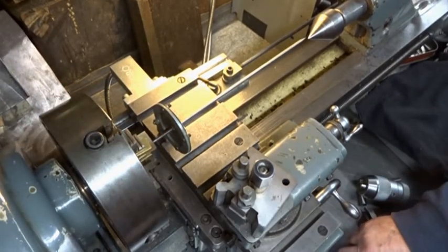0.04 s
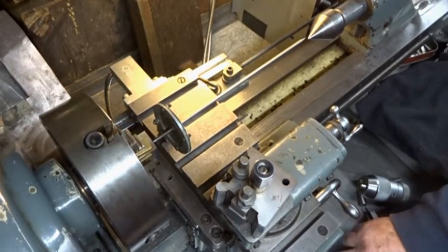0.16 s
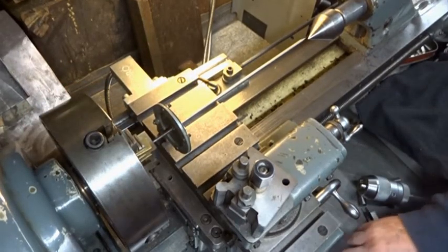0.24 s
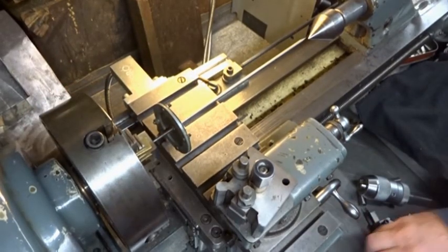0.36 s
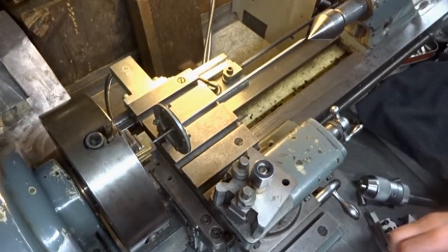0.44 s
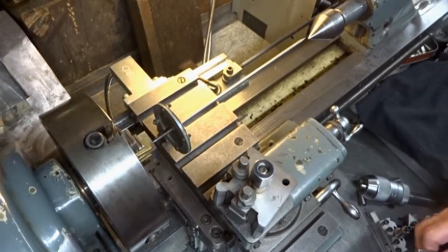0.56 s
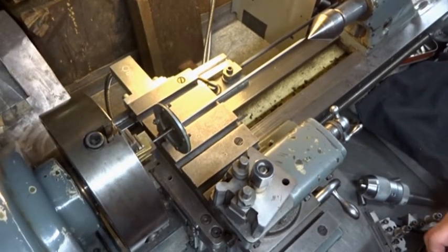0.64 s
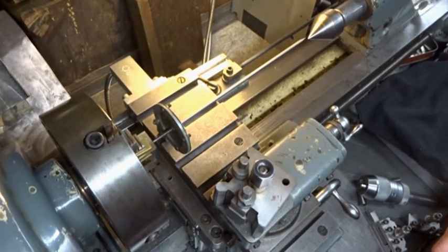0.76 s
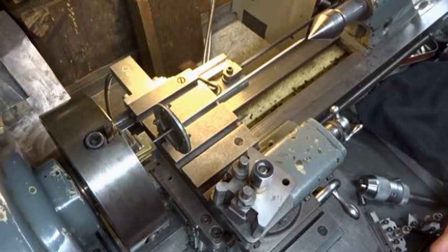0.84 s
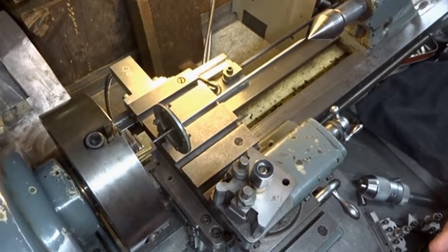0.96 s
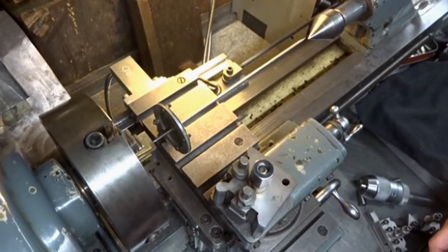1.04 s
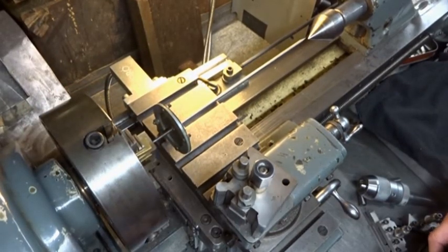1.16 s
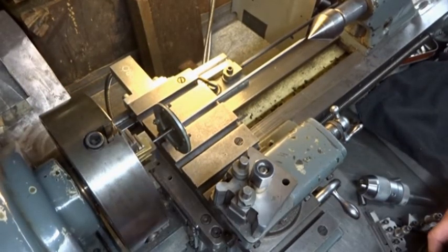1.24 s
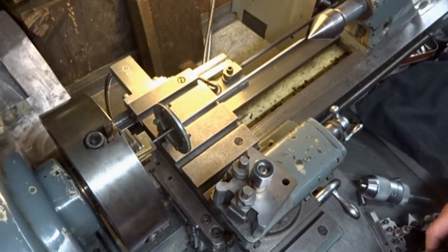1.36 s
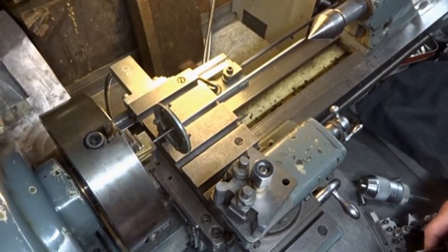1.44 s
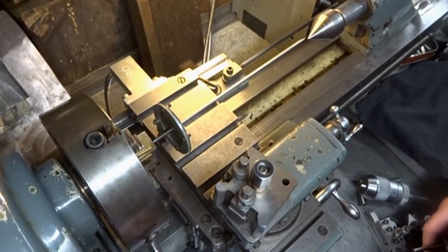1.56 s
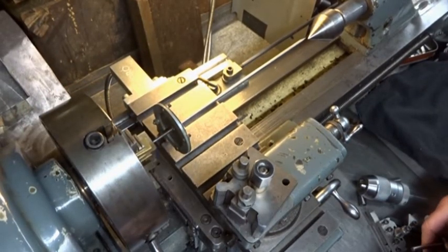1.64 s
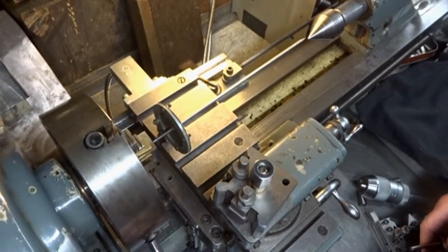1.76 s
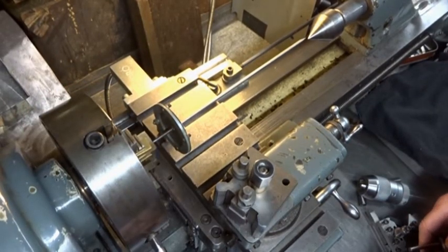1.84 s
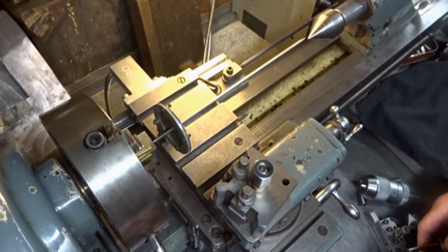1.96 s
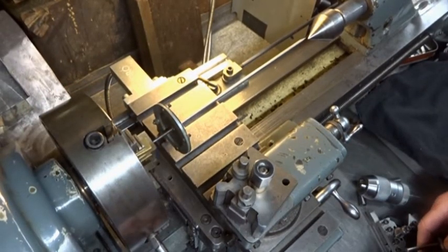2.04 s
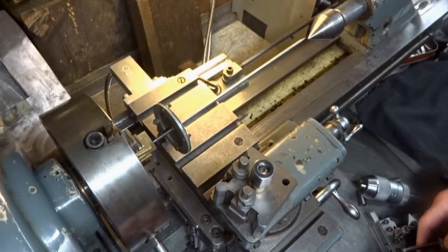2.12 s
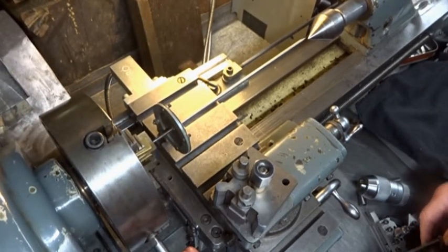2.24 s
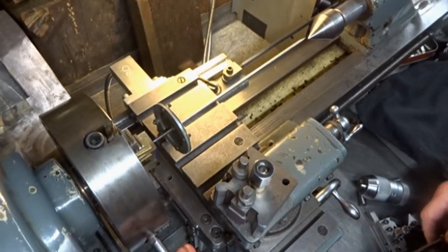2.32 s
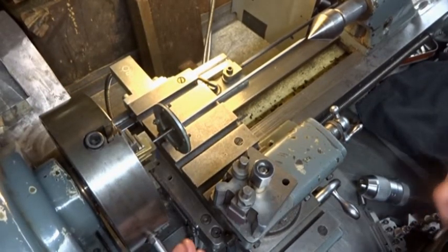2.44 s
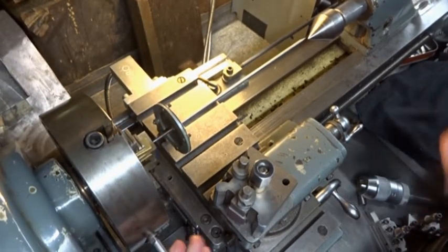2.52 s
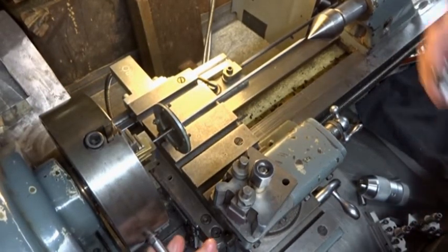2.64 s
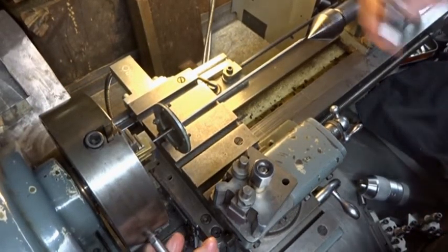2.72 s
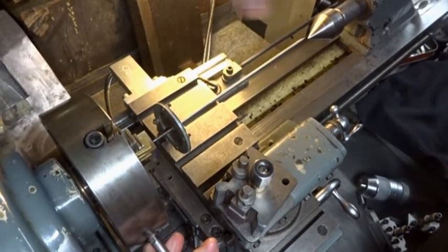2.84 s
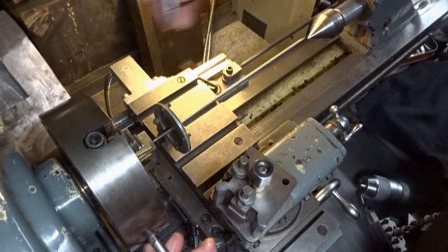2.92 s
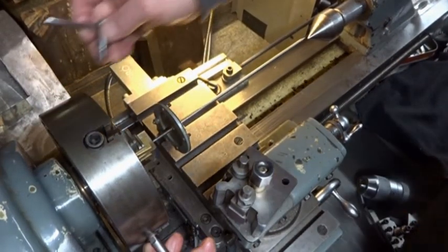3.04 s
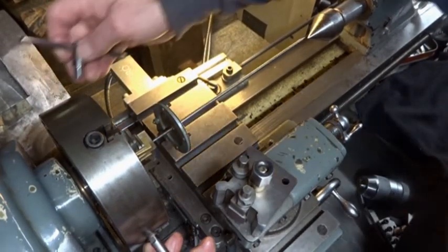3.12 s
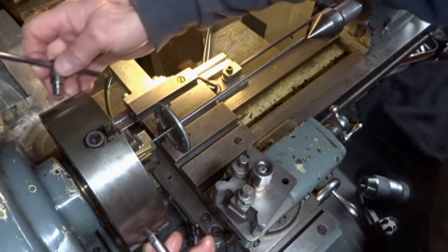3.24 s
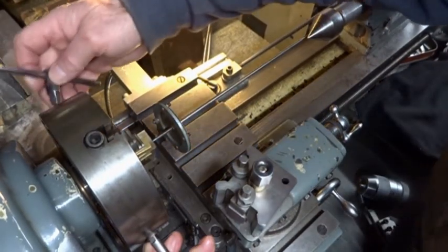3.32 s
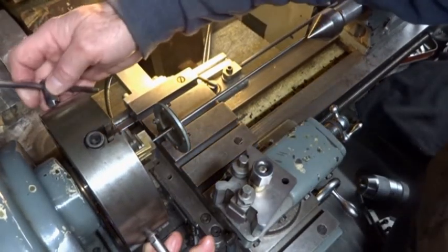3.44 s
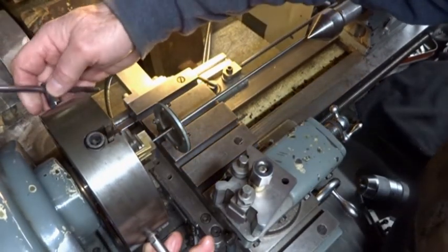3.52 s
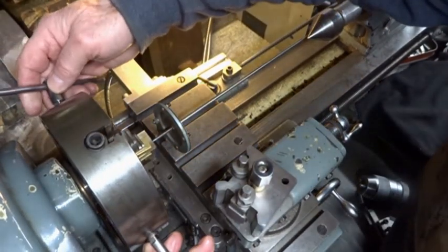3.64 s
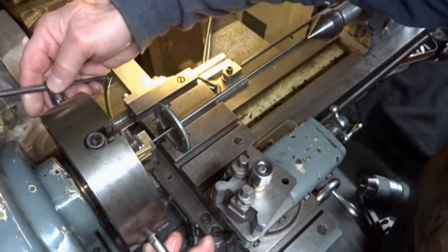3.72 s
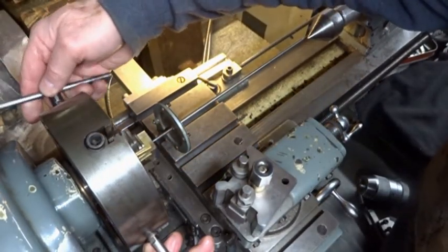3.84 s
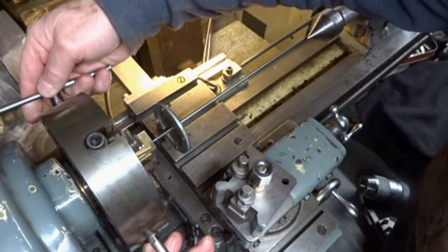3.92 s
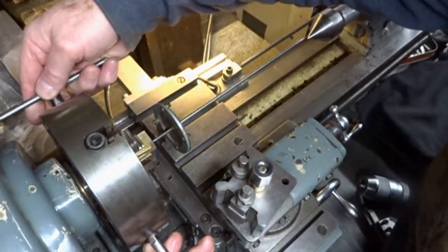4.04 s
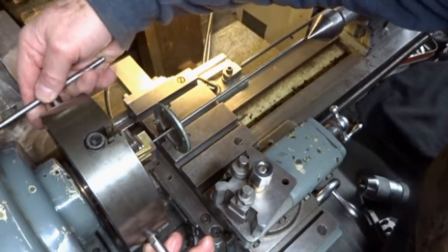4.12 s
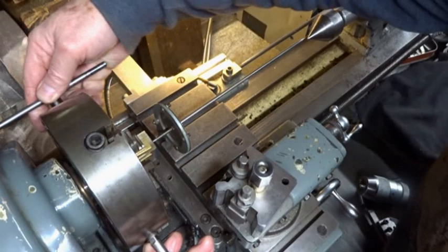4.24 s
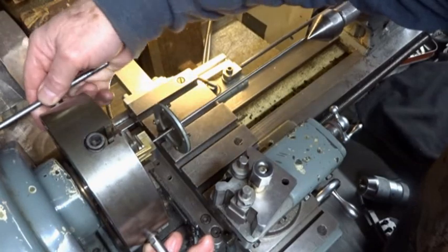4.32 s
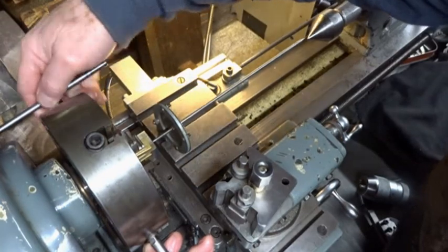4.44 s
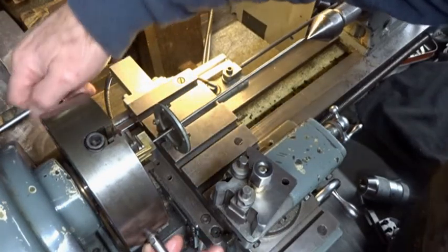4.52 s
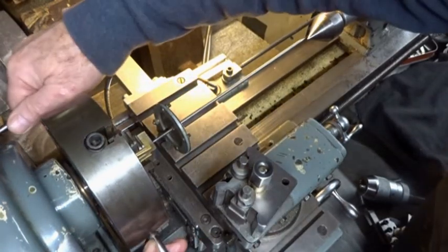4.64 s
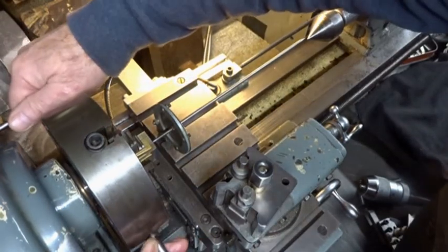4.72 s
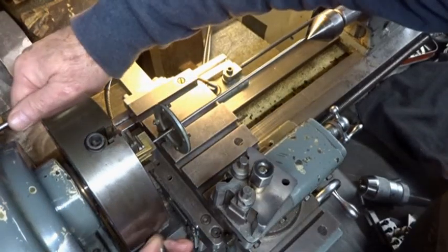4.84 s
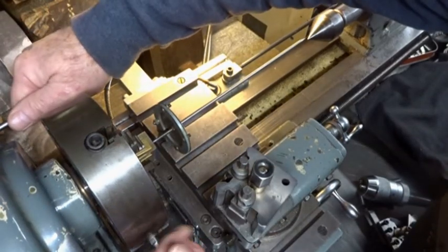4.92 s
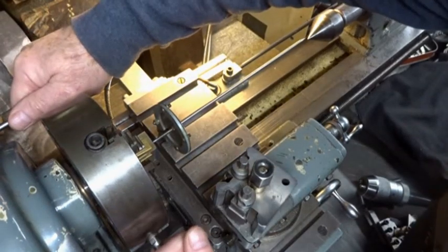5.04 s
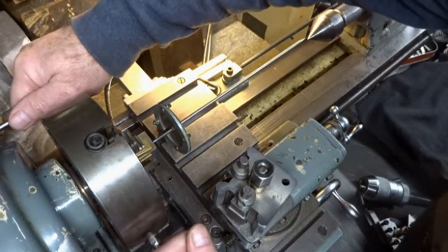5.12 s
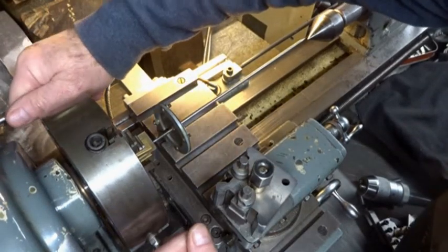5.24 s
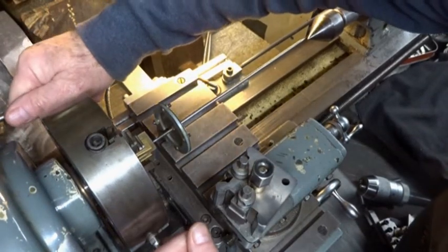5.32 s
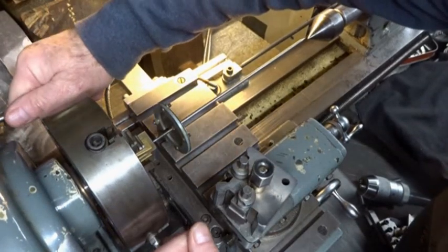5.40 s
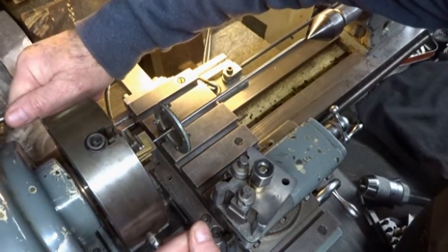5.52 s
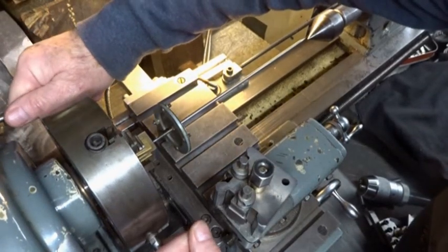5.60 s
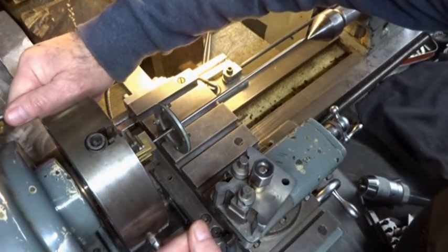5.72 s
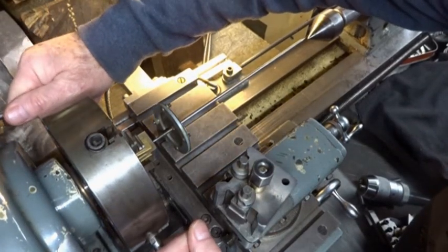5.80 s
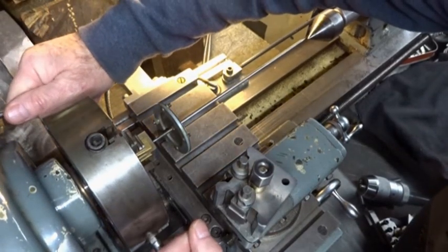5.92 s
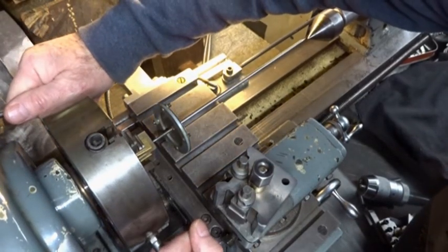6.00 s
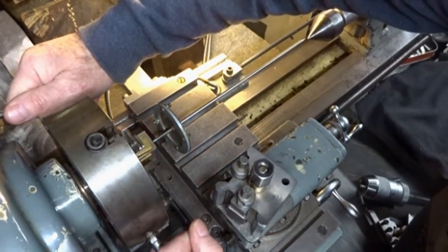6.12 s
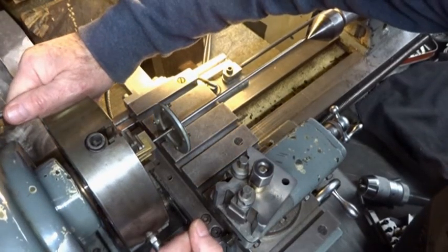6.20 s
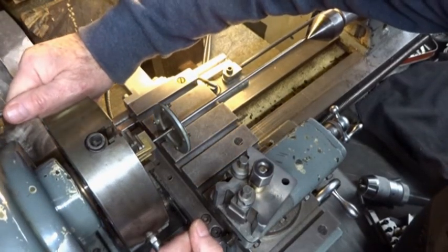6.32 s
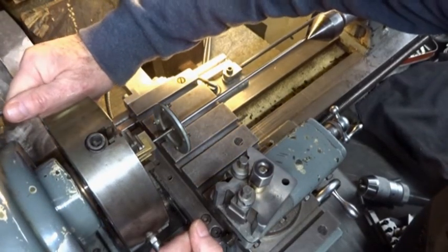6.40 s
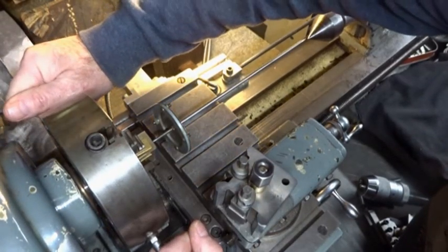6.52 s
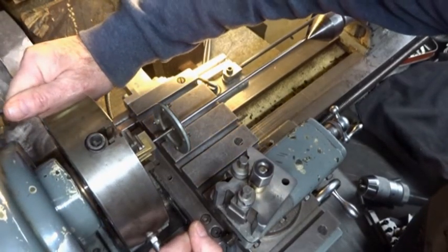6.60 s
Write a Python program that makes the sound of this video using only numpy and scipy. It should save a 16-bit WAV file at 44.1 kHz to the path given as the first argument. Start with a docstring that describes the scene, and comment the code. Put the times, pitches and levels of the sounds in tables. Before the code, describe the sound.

Close stereo pickup at a lathe in a workshop, with a faint, constant, airy fan hum throughout. At 0 s a hard, loud steel clack rings briefly; a heavy casting then grinds roughly along the bed, with further clacks near 0.2 and 0.4 s. A scrape swells from about 0.7 s into a rapid cluster of heavy clacks around 0.9 s, then dies away. After a soft rub at 1.2 s, lighter key taps begin at 1.7 s, with sharper clicks at 1.9 and 2.2 s. Cloth brushes at 2.5 s and more fully from 2.9 to 3.7 s. A bright, strong click lands at 3.4 s, followed by knocks at 3.5 to 3.7 s and scattered clicks and duller socket knocks from 4.0 to 4.5 s. A quick sleeve swish comes at 4.6 s, a tiny tap at 4.7 s and a last faint knock at 5.3 s. Mostly fan hum remains until about 6.5 s.

```python
"""A steel clack opens the scene: a lathe's tailstock, unclamped, grinds along the bed between heavy clacks.
A fan hums steadily behind, made of shaped noise with a few broad resonances.
A sleeve then rubs and brushes past, as noise that swells with each movement of the arm.
Two steel chuck keys click into the jaw screws and knock in their sockets.
Each blow is a burst of filtered noise plus decaying sine modes; a short room tail follows the steel."""
import sys
import numpy as np
from scipy import signal
from scipy.fft import rfft, irfft, next_fast_len
from scipy.io import wavfile
from scipy.ndimage import uniform_filter1d, map_coordinates

SR = 44100
rng = np.random.default_rng(int(sys.argv[2]) if len(sys.argv) > 2 else 0)


def pcm_store(signal):
    """Save signal as 16-bit PCM."""
    levels = np.round(np.clip(np.atleast_2d(signal), -1, 1) * 32767)
    wavfile.write(sys.argv[1], SR, levels.astype(np.int16).T)


N = 293688  # samples


def amp(db):
    """Decibels to gain."""
    return 10 ** (np.asarray(db) / 20)


def unit(x):
    """Scale to rms 1."""
    return x / np.sqrt(np.mean(x ** 2) + 1e-20)


def along(points, hz):
    """Read a curve of (f/Hz, value) points on a log frequency axis."""
    f, values = np.transpose(points)
    return np.interp(np.log(hz + 1), np.log(f + 1), values)


def filtered(x, response):
    """Shape x by a gain that is a function of frequency."""
    n = x.shape[-1]
    padded = next_fast_len(n + 4096)
    spectrum = rfft(x, padded) * response(np.fft.rfftfreq(padded, 1 / SR))
    return irfft(spectrum, padded)[..., :n]


def noise(colour, width, size=N):
    """Stereo noise of rms 1 with a gain by frequency and a side level by frequency."""
    def mid_side_gain(hz):
        return colour(hz) * np.array([np.ones_like(hz), amp(along(width, hz))])
    mid, side = filtered(rng.standard_normal((2, size)), mid_side_gain)
    return unit(np.array([mid + side, mid - side]))


def rush(spectrum, width, body=np.ones_like):
    """Stereo noise with a (f/Hz, level/dB) spectrum, heard through a body."""
    return noise(lambda hz: amp(along(spectrum, hz)) * body(hz), width)


def wobble(rate):
    """A smooth random curve with rate knots a second."""
    knots = rng.standard_normal(int(N * rate / SR) + 4)
    return map_coordinates(knots, [np.arange(N) * rate / SR], order=2)


def ripple(depth_db, spacing_hz):
    """Fixed random peaks and notches of a body with many close modes; shallow in the bass."""
    hz = np.arange(0, SR / 2, 8)
    field = unit(uniform_filter1d(rng.standard_normal(len(hz)), max(int(spacing_hz / 8), 1)))
    field = np.minimum(field, 2)
    return lambda f: amp(depth_db * np.interp(f, hz, field) * f / np.hypot(f, 700))


def tone(t, hz):
    """One sine partial, a little out of phase between the two channels."""
    return np.sin(2 * np.pi * hz * t + rng.uniform(0, 2 * np.pi) + rng.normal(0, 0.22, (2, 1)))


def stroke(start, length, attack_s, release_s, swell_db=0):
    """Gain of one movement: it sets in, rises by swell_db (falls if negative) and dies away."""
    t = np.maximum(np.arange(N) / SR - start, 0)
    to_go = np.maximum(1 - t / length, 0)
    release = np.exp(-np.maximum(t - length, 0) / release_s)
    return (1 - np.exp(-t / attack_s)) * amp(-swell_db * to_go) * release


# edges of the thump, knock, clank, clink and tick ranges: f/Hz
RANGE_EDGES = [120, 330, 650, 1800, 5500, 16000]


def in_range(f, lo, hi):
    """A soft-edged frequency range; the lowest is open downwards."""
    below = 1 if lo == RANGE_EDGES[0] else 1 + (lo / (f + 1)) ** 14
    return 1 / np.sqrt(below * (1 + (f / hi) ** 14))


# stereo width of the steel and the sleeve: f/Hz, side minus mid level/dB
STEEL_WIDTH = [(100, -16), (500, -11), (1000, -19), (2500, -9), (12000, -23.5)]


def strikes(rows, balance_db, decay, colour, body, modes, chatter, rise_cycles, low_t60, high_t60,
            high_ring_db, high_share, dense_db, rattle_db):
    """Steel on steel: a dense ring holds briefly, then dies away with clear modes; harder is brighter."""
    t = np.arange(SR // 3) / SR
    out = np.zeros((2, N + len(t)))
    centres = np.sqrt(np.multiply(RANGE_EDGES[:-1], RANGE_EDGES[1:]))
    octaves = np.log2(centres / np.median(centres))
    # a fast random level roughens the decay like tiny rebounds
    rattle = np.pad(amp(rattle_db * wobble(330)), (0, len(t)), "edge")

    def swell(hz):
        """Low modes build up more slowly than high ones."""
        return 1 - np.exp(-t * hz / rise_cycles)

    for s, strength_db, hardness, low_hz, high_hz, ring_db, length in rows:
        levels = strength_db + np.array(balance_db) + hardness * octaves
        blow_db = lambda hz: along(np.c_[centres, levels], hz)
        free = np.maximum(t / length - chatter, 0)  # scaled time since the faces came to rest
        hit = np.zeros((2, len(t)))

        for lo, hi, hz, t60, db in zip(RANGE_EDGES, RANGE_EDGES[1:], centres, decay, levels):
            dense_gain = lambda f: in_range(f, lo, hi) * amp(along(colour, f)) * body(f)
            band = noise(dense_gain, STEEL_WIDTH, size=len(t))
            hit += amp(db + dense_db - 60 * free / t60) * swell(hz) * band

        # the point of contact picks two modes of its own; hardness below 0 lifts the high one
        high_db = high_ring_db + high_share * ring_db - 0.5 * min(hardness, 0)
        for hz, db, t60 in (low_hz, ring_db, low_t60), (high_hz, high_db, high_t60):
            hit += amp(blow_db(hz) + db - 60 * free / t60) * swell(hz) * tone(t, hz)

        for hz, db, t60 in modes:
            mode_db = blow_db(hz) + rng.normal(0, 0.82) + db  # excited a little differently each time
            hit += amp(mode_db - 60 * t / (t60 * length)) * swell(hz) * tone(t, hz)

        start = round(s * SR)
        out[:, start:start + len(t)] += hit * rattle[start:start + len(t)]
    return out[:, :N]


# heavy blows: t/s, relative strength level/dB, hardness [dB per octave], low ring f/Hz, high ring f/Hz,
# low ring level/dB relative to the blow, decay length factor
TAILSTOCK_BLOWS = [ (0, -23.5, 0.67, 1261, 7730, -3, 0.8), (.228, -34, -0.9, 1385, 3200, -1.5, 1.11),
                   (.29, -53.5, -5, 220, 3020, 9, 1.7), (.391, -29, -0.5, 877, 7840, 11, 0.83),
                   (.475, -46, -2.4, 887, 3360, 10.5, 2.4), (.731, -54.5, -4.5, 1360, 3260, 8, 1.3),
                   (.861, -43.5, -4, 1360, 2260, 16, .7), (.889, -26.5, 2, 455, 10360, 9.5, 1.01),
                   (.918, -33.5, 1, 827, 2660, 7, 0.85), (.942, -32.5, .5, 700, 3380, -11, 0.55)]
# pushes over the bed: start t/s, length t/s, relative grind level/dB at the end, swell on the way level/dB,
# hiss level/dB relative to the grind, before the layer trims
BED_PUSHES = [ (0.091, 0.16, -44.5, -1, -4.5), (0.295, 0.094, -60, -5, 0), (0.436, 0.049, -36.5, 9, -1.5),
              (0.53, .2, -53.5, 2, -5.5), (0.723, 0.16, -31, 14, -6), (1.009, 0.26, -64, -4.5, 7.5)]
# level/dB of the five ranges at hardness 0
BED_BALANCE = [-18.5, -9.5, 1.5, -2.5, -2.5]
# t60 t/s of the dense ring in the five ranges, before the length factor
BED_RING_DECAY = [0.34, 0.26, 0.17, 0.18, 0.14]
# slope of the dense ring within the ranges: f/Hz, relative level/dB
BED_RING_COLOUR = [(40, -55), (85, -14), (140, -18), (200, -1), (260, -2), (340, -5.5), (450, -5.5),
                   (900, 8), (2000, 0.5), (16000, -10)]
# clear modes that every blow shares: f/Hz, level/dB relative to the blow, t60 t/s before the length factor
BED_CLEAR_MODES = [(447, 2.5, 0.19), (670, -2.5, 0.18), (877, -5, 0.077), (1083, -4, 0.047),
                   (1480, -15, 0.11), (3400, 0.5, 0.049), (6930, -15, 0.29), (7730, -9, 0.093),
                   (10200, -41, 0.058)]
# spectrum of the low scrape: f/Hz, relative level/dB per Hz
GRIND_SPECTRUM = [(50, -37), (140, -39), (200, -14), (350, -5), (460, 7.5), (700, 3.5), (880, 8.5),
                  (1020, 1), (1450, 13), (1750, -4), (4000, -20), (6000, -50)]
# spectrum of the bright scrape: f/Hz, relative level/dB per Hz
HISS_SPECTRUM = [(1060, -31), (1800, -2), (2100, 0.5), (3840, -5.5), (5700, -11.5), (6650, -9.5),
                 (13700, -17), (16000, -17)]


def tailstock():
    """The casting clacks against its stops and grinds over the ways in between."""
    bed = ripple(depth_db=2.0, spacing_hz=36)
    grind, hiss = np.zeros((2, N))
    for s, length, db, swell_db, hiss_db in BED_PUSHES:
        push = amp(db) * stroke(s, length, attack_s=0.01, release_s=0.022, swell_db=swell_db)
        grind = np.hypot(grind, push)
        hiss = np.hypot(hiss, amp(hiss_db) * push)

    # the faces catch and let go: about 130 slips a second, each a 4.7 ms surge of random strength
    slips = (rng.random(N) < 130 / SR) * amp(rng.normal(0, 3, N))
    surges = signal.lfilter([1], [1, -np.exp(-1 / (0.0047 * SR))], slips)
    grip = unit(1.1 + surges)
    low_scrape = amp(-1.0) * grind * rush(GRIND_SPECTRUM, STEEL_WIDTH, bed)
    bright_scrape = amp(-2.1) * hiss * rush(HISS_SPECTRUM, STEEL_WIDTH, bed)

    clacks = strikes(
        TAILSTOCK_BLOWS, BED_BALANCE, BED_RING_DECAY, BED_RING_COLOUR, bed, BED_CLEAR_MODES,
        chatter=0.0076, rise_cycles=1.0, low_t60=0.11, high_t60=0.081,
        high_ring_db=-2.5, high_share=0.24, dense_db=-0.5, rattle_db=0.75)
    return grip * (low_scrape + bright_scrape) + clacks


# reverberation time: f/Hz, t60 t/s
ROOM_DECAY = [(200, 0.43), (1000, 0.43), (4000, 0.36), (9000, 0.17)]


def workshop(x):
    """The room's answer: a noise tail, 8 ms late, each frequency dying at its own speed."""
    hz, t, z = signal.stft(rng.standard_normal((2, SR // 2)), SR, nperseg=256)
    fade = amp(-60 * t / along(ROOM_DECAY, hz)[:, None])
    mid, side = signal.istft(z * fade, SR, nperseg=256)[1]
    tail = np.array([mid + amp(-14.5) * side, mid - amp(-5.5) * side])
    tail = np.pad(tail / np.linalg.norm(tail[0]), ((0, 0), (SR // 125, 0)))
    return signal.fftconvolve(x, tail, axes=1)[:, :N]


# spectrum of the soft rush: f/Hz, relative level/dB per Hz
FAN_SPECTRUM = [(15, -69), (25, -38), (76, -40), (206, -28), (242, -34.5), (317, -19), (373, -21),
                (416, -20), (624, -18.5), (796, -14.5), (863, -17.5), (1230, -15), (1480, -6.5),
                (2840, -25), (16000, -28)]
# duct resonances: f/Hz, width f/Hz, relative level/dB
DUCT_RESONANCES = [(1458, 295, -4), (1648, 43, -6.5), (2125, 89, -11.5)]
# stereo width of the fan: f/Hz, side minus mid level/dB
FAN_STEREO = [(60, 6), (150, -7), (380, 5.5), (950, 7), (2380, 1), (5980, -1), (15000, -36.5)]


def fan():
    """Air hums in a few broad duct resonances over a soft rush."""
    def duct(f):
        return sum(amp(db) / (1 + ((f - hz) / width * 2) ** 2) for hz, width, db in DUCT_RESONANCES)
    # negative depth turns the ripple over: its notches are limited instead of its peaks
    air = rush(FAN_SPECTRUM, FAN_STEREO, ripple(depth_db=-1.9, spacing_hz=39.3))
    return amp(-55.5) * air + amp(-57.5) * noise(duct, FAN_STEREO)


# the arm rubs on the machine: start t/s, length t/s, level/dB before the layer trim
ARM_RUBS = [(1.208, 0.058, -65), (2.839, 0.073, -65.5), (3.055, 0.26, -66), (3.357, 0.37, -69),
            (4.163, 0.43, -70), (4.613, 0.26, -69.5)]
# sweeps of the sleeve: fastest moment t/s, bell width t/s, level/dB before the layer trim
SLEEVE_SWEEPS = [(2.51, 0.037, -54.5), (2.93, 0.079, -61.5), (3.161, 0.27, -58.5), (3.52, 0.26, -60),
                 (4.25, 0.05, -61), (4.58, 0.045, -51.5), (4.78, 0.21, -60)]
# spectrum of the rub: f/Hz, relative level/dB per Hz
RUB_SPECTRUM = [(50, -37), (150, -22), (210, -20.5), (275, -2.5), (400, -7.5), (700, -10.5), (1200, -4.5),
                (2500, -28)]
# spectrum of the brushing cloth: f/Hz, relative level/dB per Hz
CLOTH_SPECTRUM = [(1200, -27), (2200, -2), (3100, -2), (4000, -3), (6800, 1), (9500, -4), (12000, 1.5),
                  (16000, -8.5)]


def sleeve():
    """Cloth brushes and rubs as the arm reaches over the chuck; steel faces near it colour the brush."""
    t = np.arange(N) / SR
    # each sweep speeds up and slows down in a bell
    sweeps = [amp(db) / (1 + ((t - s) / width) ** 2 / 2) for s, width, db in SLEEVE_SWEEPS]
    rubs = [amp(db) * stroke(s, length, attack_s=0.012, release_s=0.03) for s, length, db in ARM_RUBS]
    brush = np.sqrt(sum(sweep ** 2 for sweep in sweeps))
    rub = np.sqrt(sum(one_rub ** 2 for one_rub in rubs))
    faces = ripple(depth_db=2.5, spacing_hz=122.3)
    fibres = amp(1.6 * wobble(12) + 0.52 * wobble(40) + 0.48 * wobble(520))
    brushing = amp(0.5) * brush * rush(CLOTH_SPECTRUM, STEEL_WIDTH, faces)
    rubbing = amp(4.5) * rub * rush(RUB_SPECTRUM, STEEL_WIDTH)
    return fibres * (brushing + rubbing)


# key contacts: t/s, relative strength level/dB, hardness [dB per octave], low ring f/Hz, high ring f/Hz,
# low ring level/dB relative to the blow, decay length factor
KEY_CONTACTS = [ (1.677, -54, -.3, 1160, 2853, 3, 0.9), (1.855, -55, -2, 1760, 2770, -4, 7.7),
                (1.888, -40, 5, 1441, 8350, 1.5, 1.1), (1.892, -43, 2, 689, 5720, 13, 0.85),
                (2.026, -61.5, 2, 1480, 2910, 11.5, 0.99), (2.18, -53.5, 3.5, 2170, 8260, 4.5, 0.42),
                (2.202, -45, 2, 484, 2800, 5, 0.6), (2.208, -54, 1.6, 419, 3630, 12, 1.45),
                (2.328, -52.5, -6.5, 419, 8600, 11, 1.01), (2.357, -69, 3, 470, 8500, 8, 1.3),
                (2.845, -57.5, -7.5, 270, 2950, 16, 0.25), (2.89, -58.5, 0.3, 1130, 2970, 7, 0.86),
                (3.074, -59, 5, 1160, 3070, -3, 0.61), (3.129, -61, 3, 1150, 3060, 3, .5),
                (3.429, -37, 3, 2326, 7730, 3.5, 0.9), (3.522, -49.5, 0.5, 877, 3460, 3.5, 1.34),
                (3.541, -49, -1.2, 830, 3400, 3.5, 1.3), (3.6, -54.5, -2, 687, 7800, 6, 2.4),
                (3.694, -44.5, 4.5, 854, 8420, 10.5, 0.61), (4.039, -46, 1.5, 1546, 8400, 3.5, 0.69),
                (4.184, -47.5, -3.5, 1152, 8100, 8.5, 0.84), (4.188, -52.5, -2, 1440, 8280, 15.5, 0.69),
                (4.332, -48.5, -5.5, 413, 8200, 7.5, 0.96), (4.42, -54.5, -7.5, 447, 8300, 13.5, 0.6),
                (4.47, -55, 2, 1560, 3140, -2, 0.42), (4.703, -56, 5, 1230, 4530, -4, 0.58),
                (5.283, -56.5, -2, 447, 4630, 4, 0.85), (5.309, -68, 6.5, 470, 5600, -8, 1.9)]
# level/dB of the five ranges at hardness 0
KEY_BALANCE = [-11.5, -6, 1, 1.5, -2.5]
# t60 t/s of the dense ring in the five ranges, before the length factor
KEY_RING_DECAY = [0.16, 0.46, 0.21, 0.12, 0.063]
# slope of the dense ring within the ranges: f/Hz, relative level/dB
KEY_RING_COLOUR = [(60, -30), (150, -22.5), (215, -14), (340, -13), (410, 16), (4500, 14), (6500, -2.5),
                   (8600, 2.5), (10500, -6), (16000, -14)]
# clear modes that every contact shares: f/Hz, level/dB relative to the blow, t60 t/s before the length factor
KEY_CLEAR_MODES = [(411, -4, 0.31), (470, -4, 0.34), (689, -9, 0.16), (1205, -15.5, 0.17), (1476, -7, 0.11),
                   (2850, -14.5, 0.15), (3550, -13, 0.18), (8000, -19, 0.1)]


def keys():
    """The square ends of the keys tap the chuck and take up the play in the screw sockets."""
    chuck = ripple(depth_db=7.0, spacing_hz=54.9)
    return strikes(
        KEY_CONTACTS, KEY_BALANCE, KEY_RING_DECAY, KEY_RING_COLOUR, chuck, KEY_CLEAR_MODES,
        chatter=0.0017, rise_cycles=3.1, low_t60=0.12, high_t60=0.05,
        high_ring_db=2.0, high_share=0.76, dense_db=-0.9, rattle_db=1.5)


def scene():
    """The lathe close by with its room tail, the sleeve, and the fan behind."""
    steel = tailstock() + keys()
    return steel + amp(-16) * workshop(steel) + sleeve() + fan()


def record(dry):
    """Keep only what lies below a 16 kHz band limit."""
    return filtered(dry, lambda hz: hz < 16000)


dry = scene()
out = record(dry)
pcm_store(out)
```